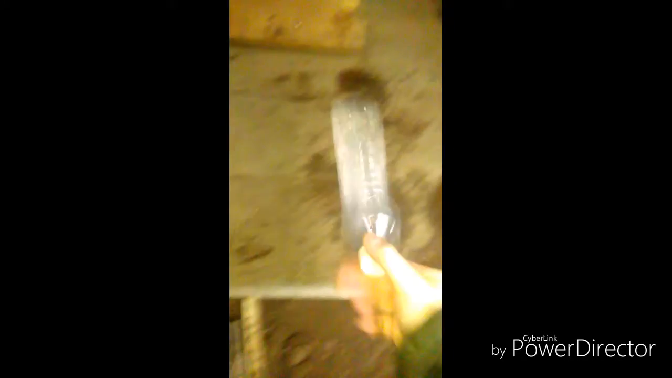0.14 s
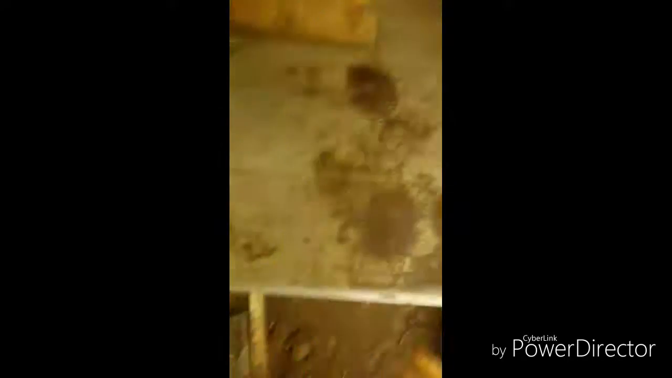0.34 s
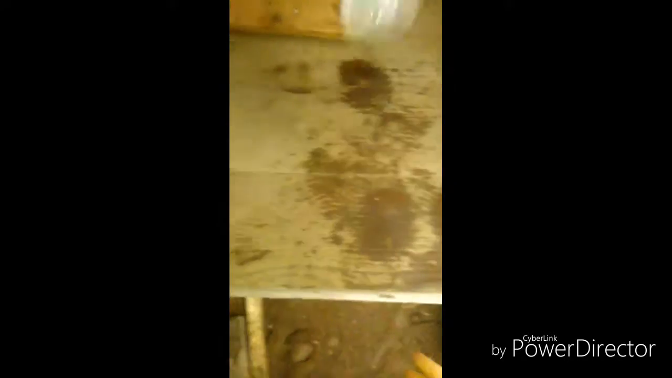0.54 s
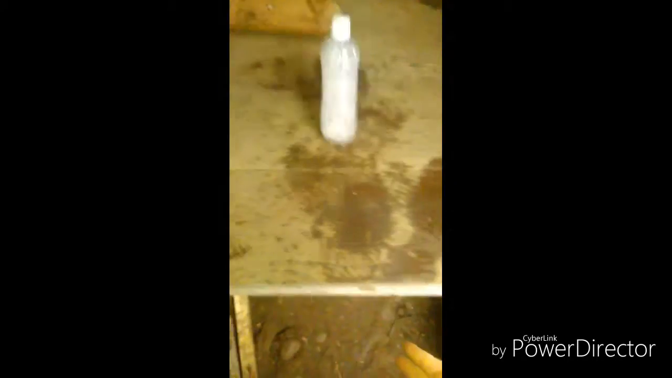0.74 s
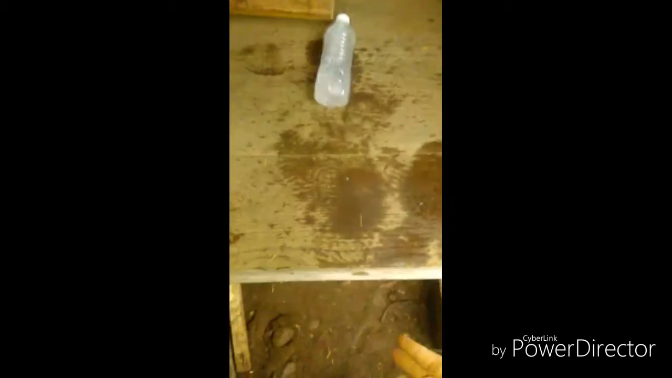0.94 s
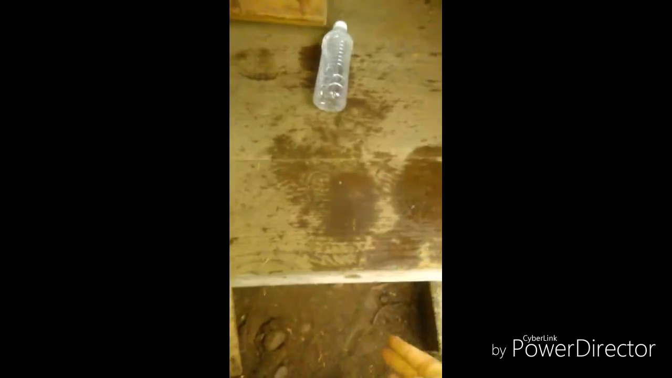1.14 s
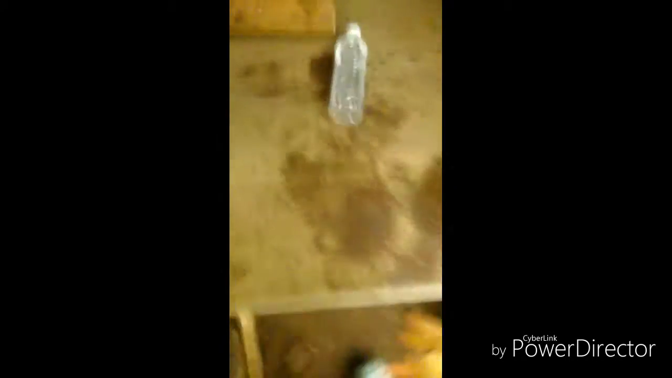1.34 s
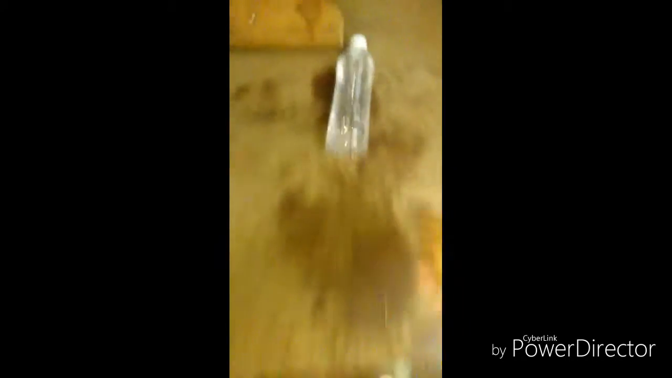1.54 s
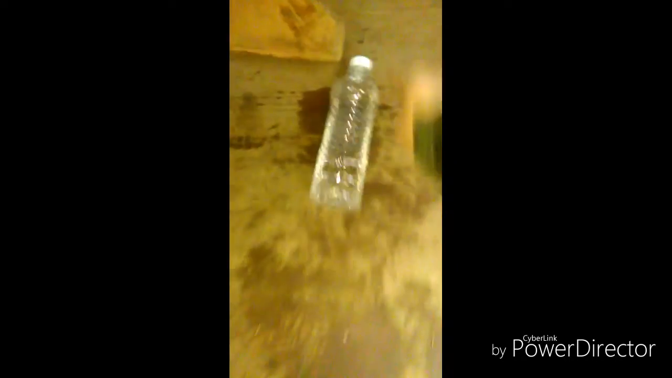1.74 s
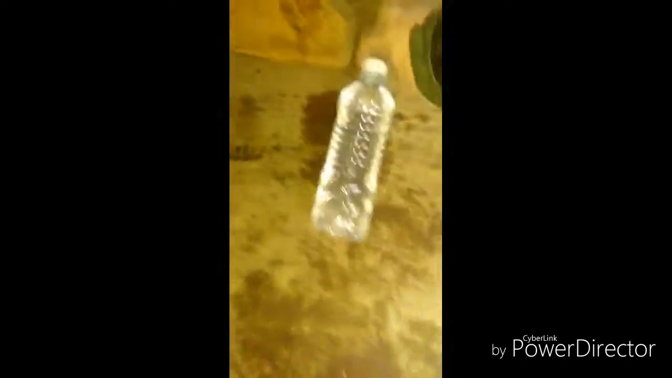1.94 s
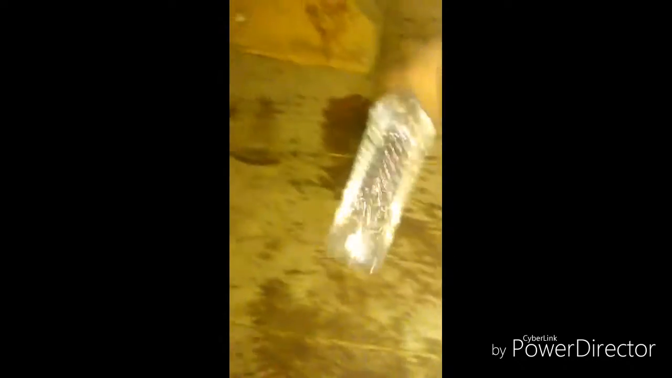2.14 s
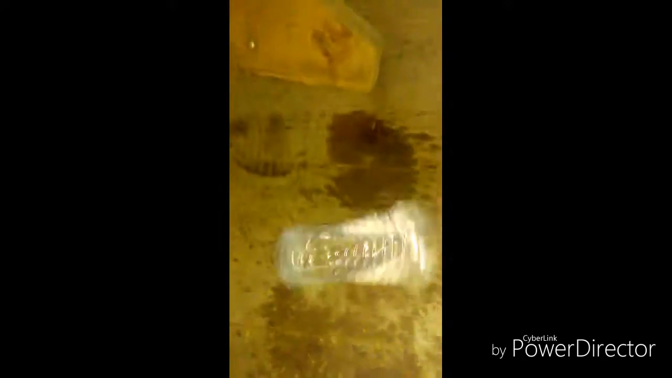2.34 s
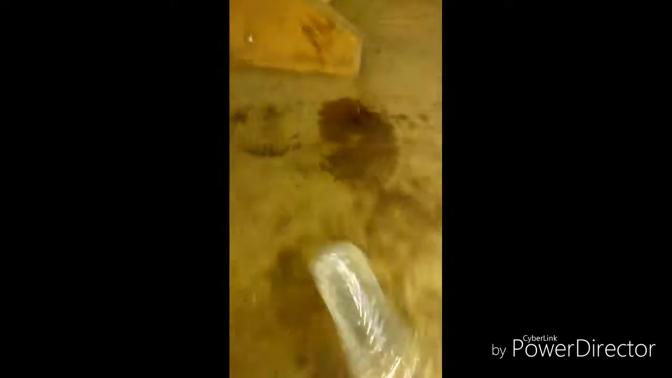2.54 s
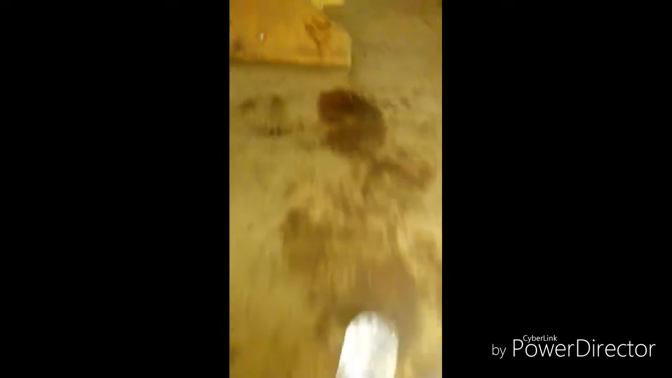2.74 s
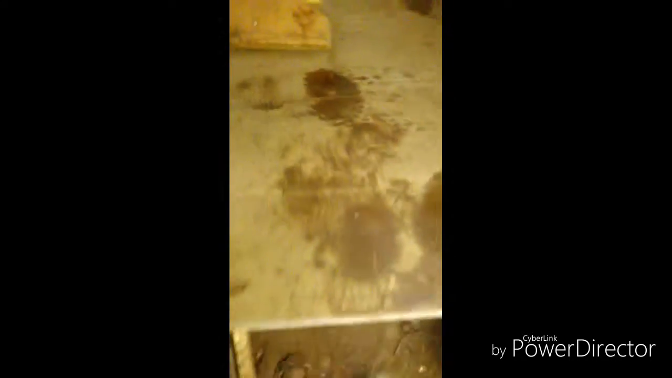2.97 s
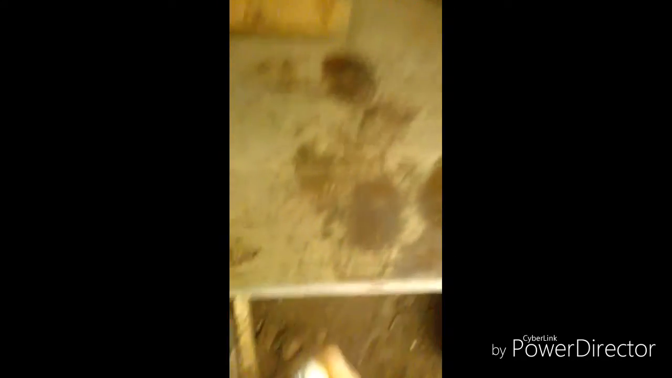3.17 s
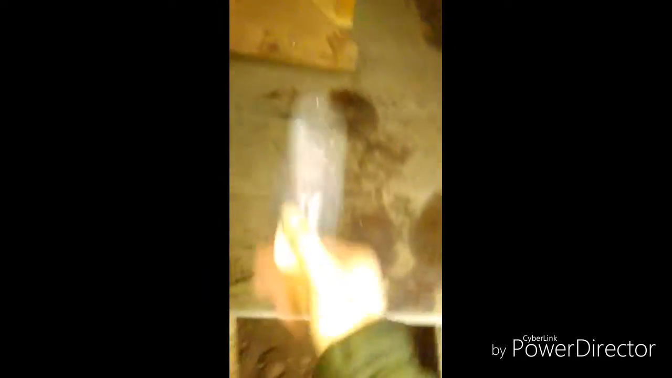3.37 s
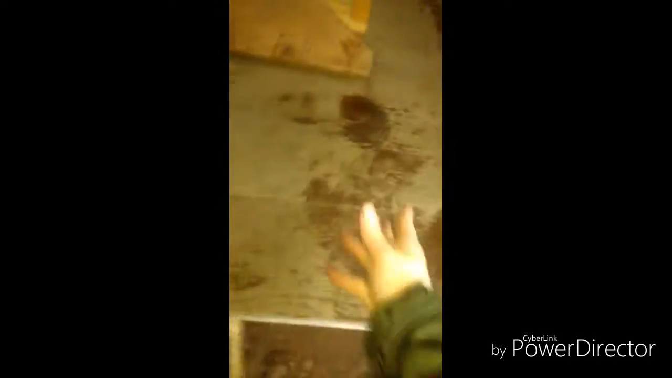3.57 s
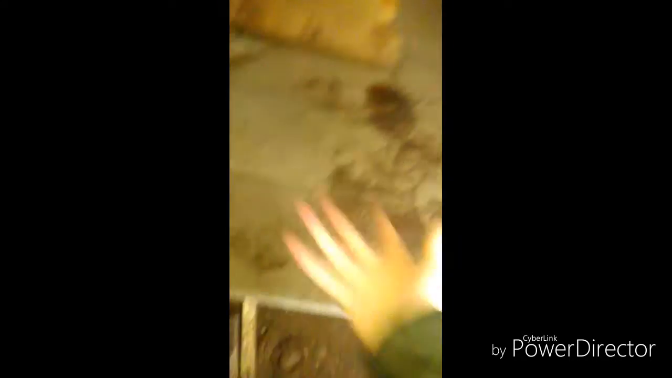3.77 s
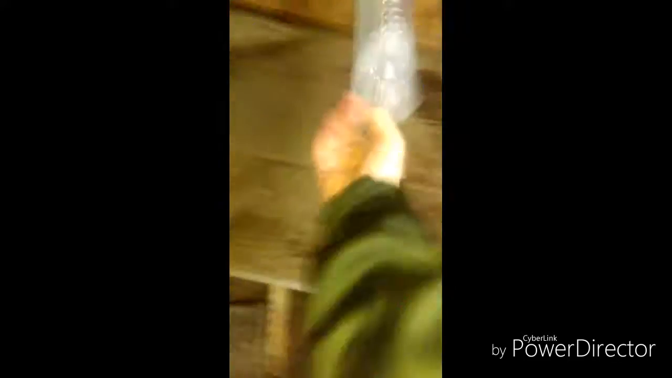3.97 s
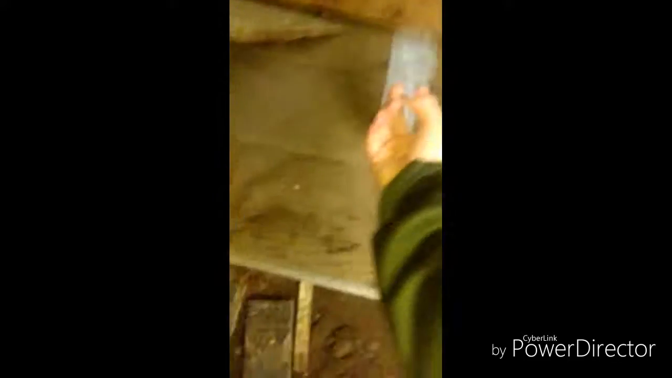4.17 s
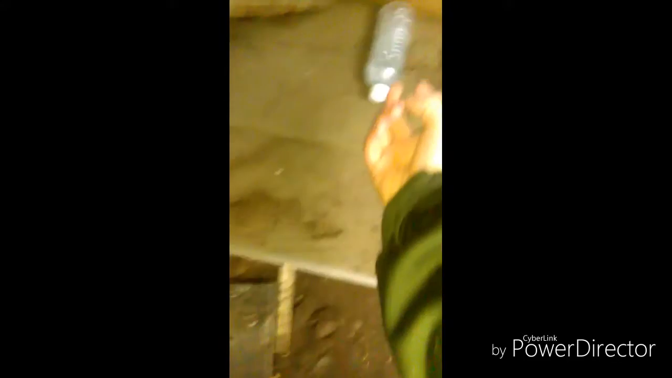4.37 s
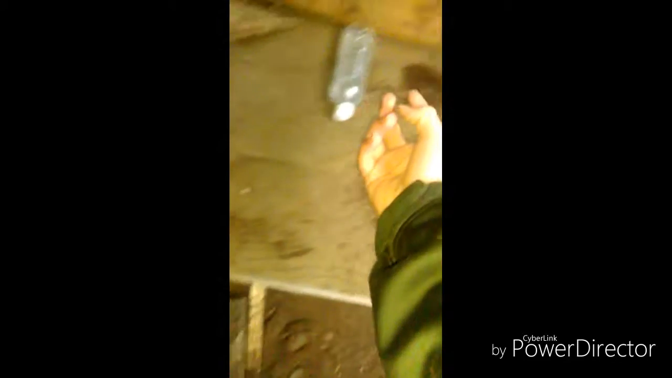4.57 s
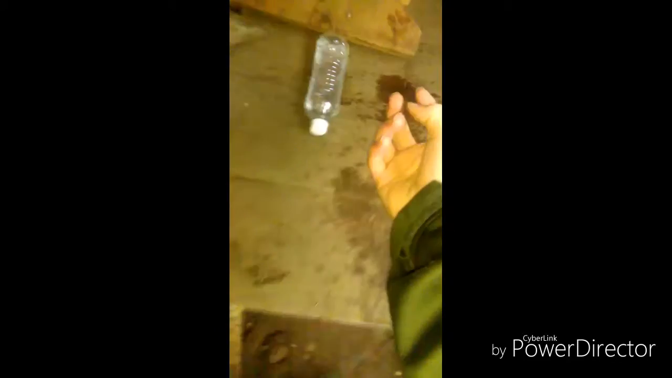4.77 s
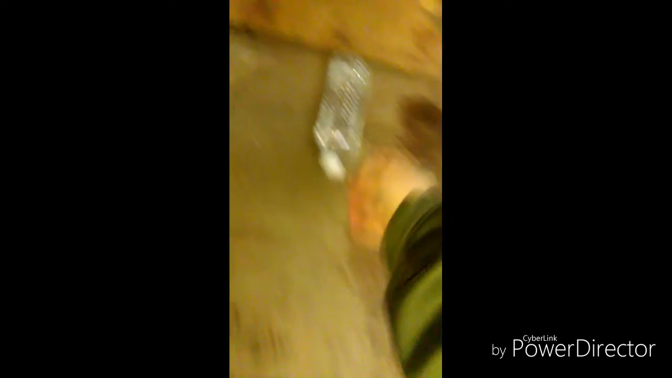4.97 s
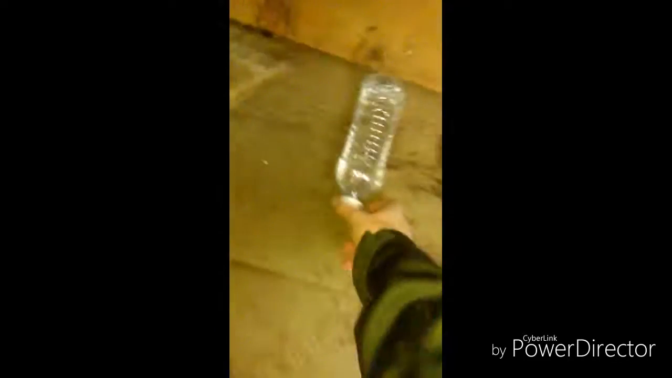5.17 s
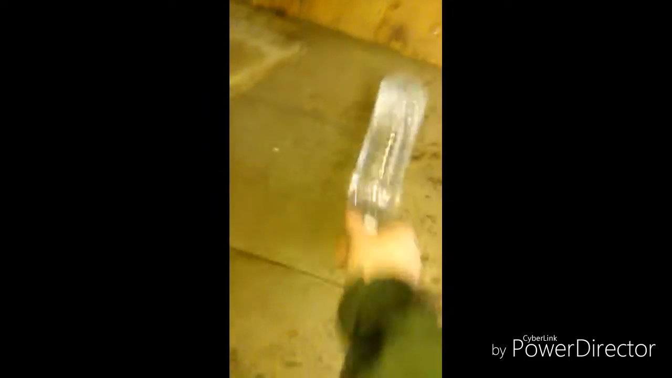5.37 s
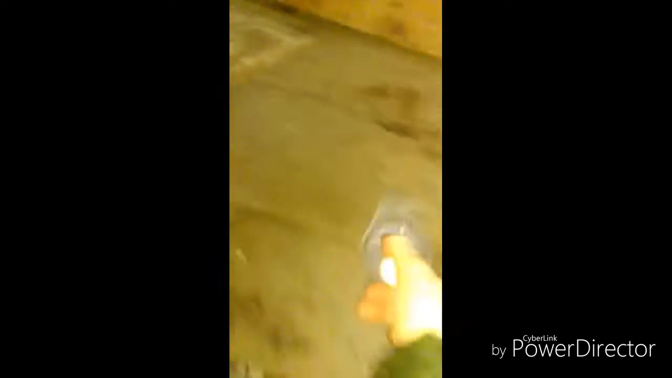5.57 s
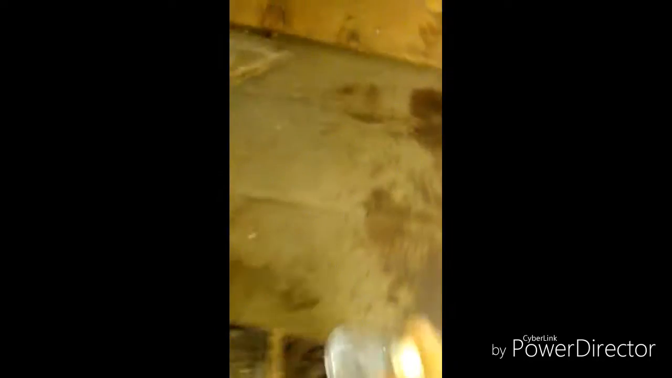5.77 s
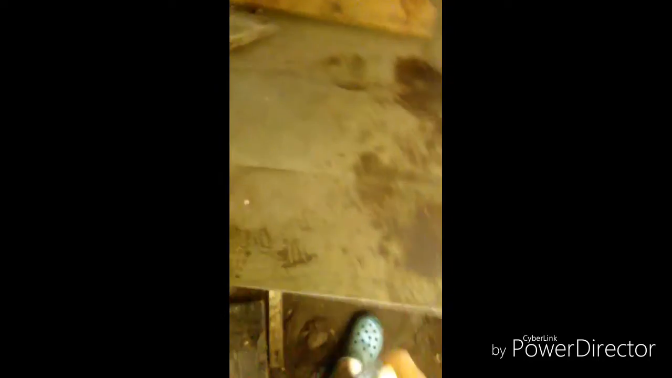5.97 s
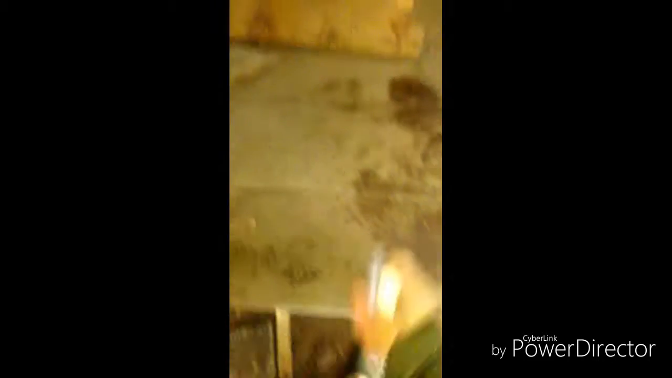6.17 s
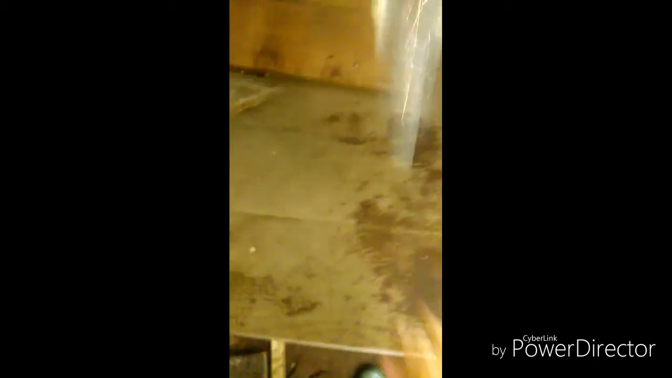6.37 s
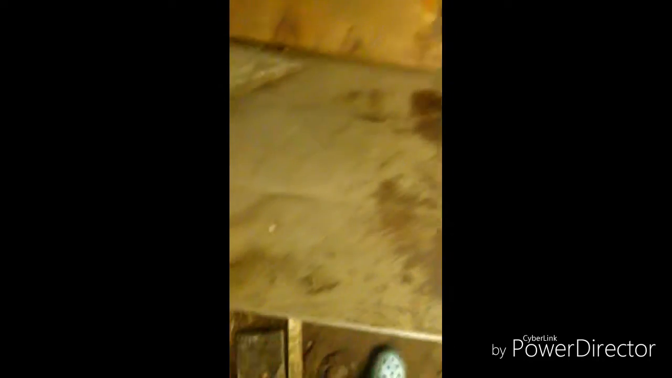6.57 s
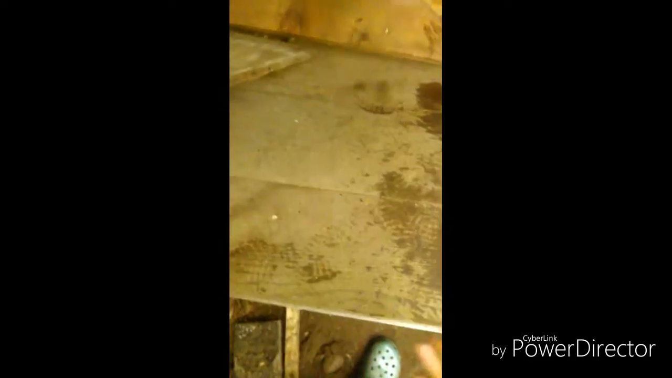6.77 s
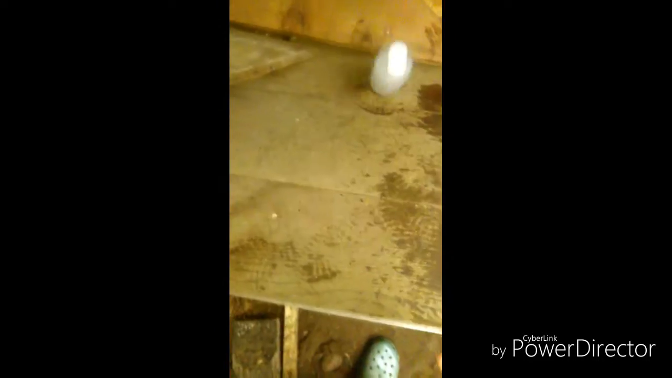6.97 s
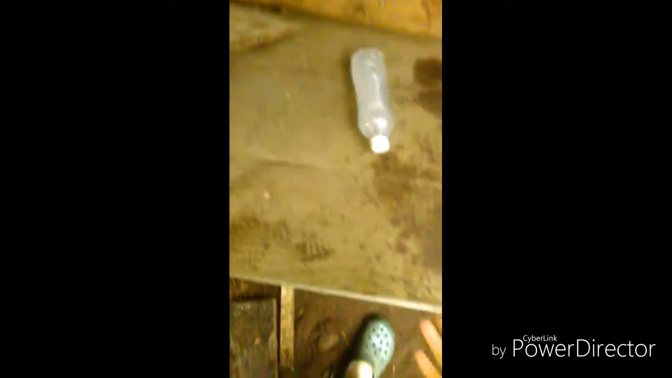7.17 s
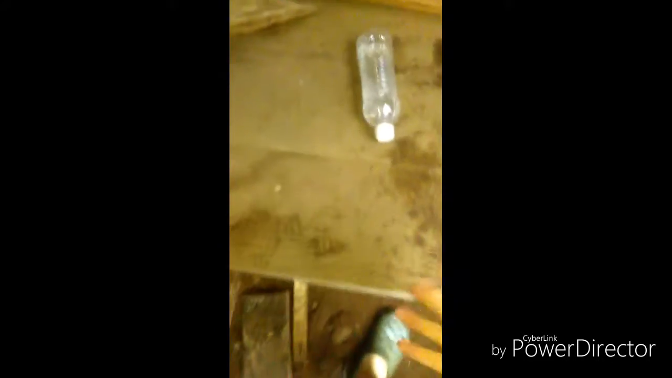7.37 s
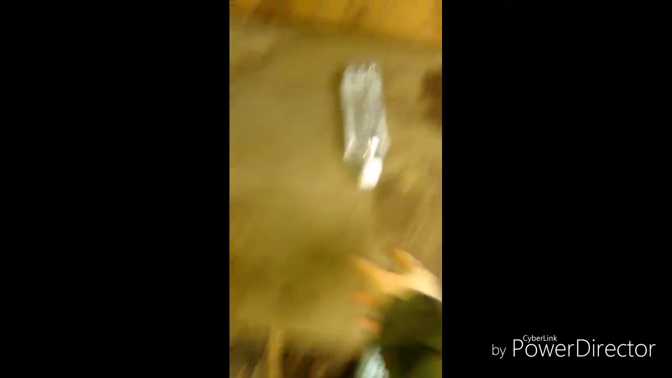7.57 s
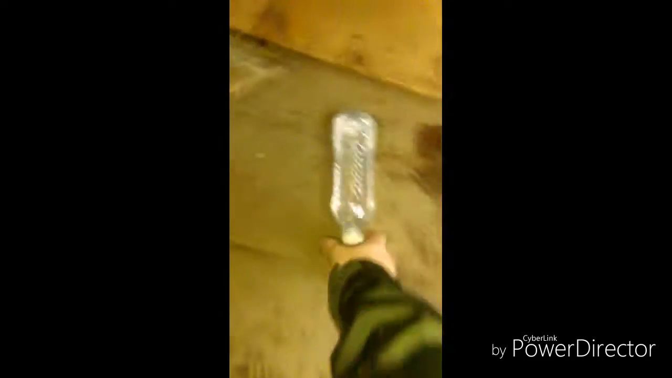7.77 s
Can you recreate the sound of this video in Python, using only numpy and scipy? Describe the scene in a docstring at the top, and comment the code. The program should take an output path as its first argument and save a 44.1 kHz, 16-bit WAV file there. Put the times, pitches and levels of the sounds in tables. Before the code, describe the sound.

A part-filled plastic bottle is flipped three times onto wooden boards, landing with hard cracking thuds, toppling with clatter, then grabbed with crinkles and sloshing.

```python
"""A part-filled plastic water bottle is flipped three times onto wooden boards in a small, hard-walled room.
Each time it lands with a thud and a crack of its thin shell, topples and clatters down on its side.
Boards, body and shell are banks of damped modes struck in quick contacts; noise bursts add crack and crinkle.
Between throws a hand grabs it (taps, squeaks, scuffs, dents) and the water sloshes as noise and bubbles.
Shaped noise makes the sleeve, low bumps, a soft brush and the air; decaying noise makes the room."""
import sys
import numpy as np
from scipy import signal
from scipy.fft import rfft, irfft, next_fast_len
from scipy.io import wavfile
from scipy.ndimage import map_coordinates

SR = 44100
rng = np.random.default_rng(int(sys.argv[2]) if len(sys.argv) > 2 else 0)


def wav_record(signal):
    """Record a signal, one row per channel, as 16-bit PCM in the file named by sys.argv[1]."""
    frames = np.transpose(np.atleast_2d(signal))
    bounded = np.clip(frames, -1, 1)
    # unit amplitude maps onto the largest positive 16-bit level
    quanta = np.round(bounded * 32767).astype(np.int16)
    wavfile.write(sys.argv[1], SR, quanta)


N = 344904  # length in samples
RING = np.arange(SR // 4) / SR  # time axis of one short sound, s

# modes of the wooden boards: (f/Hz, level/dB, t60/s)
BOARDS = [(46.7, -29, 0.94), (63, -23, 0.75), (73.7, -19.5, 0.71), (93.4, -12, 0.35), (111.2, -15.5, 0.49),
          (148, 8, 0.053), (149.1, -5.5, 0.18), (196.6, -14, 0.35), (238.4, -2, 0.037)]
# modes of the water-loaded body: (f/Hz, level/dB, t60/s)
BODY = [(264, 5, 0.047), (303.5, 0.5, 0.15), (339.6, -10.5, 0.29), (356, -3, 0.011), (471, -1, 0.14),
        (552, -5.5, 0.1), (617, -12.5, 0.071), (706, -8, 0.071), (1070, -26, 0.0049), (1062, -4, 0.058)]
# modes of the thin shell: (f/Hz, level/dB, t60/s)
SHELL = [(1700, -19, 0.03), (1876, -15, 0.03), (1990, -7, 0.014), (2285, 3, 0.018), (2550, -4, 0.018),
         (2710, -9, 0.014), (2860, -7, 0.018), (3420, -17, 0.02), (3700, -13, 0.016), (4350, -17, 0.03)]
# spectrum of the shell's crack: (f/Hz, level/dB)
CRACK = [(400, -15), (900, 13.5), (1400, 7), (2400, 8), (3500, -2), (5500, -6), (8000, -2), (15000, -44)]
# spectrum of the crinkling wall: (f/Hz, level/dB)
CRINKLE = [(2500, -3.5), (5000, 1), (7000, 2), (10000, 7), (12500, -3.5), (15000, -10)]
# spectrum of gulping water: (f/Hz, level/dB)
GULP = [(100, -16), (200, -3), (300, -0.5), (420, -6), (620, -1), (800, -11), (1100, -9.5), (2500, -44)]


def amp(db):
    """Decibels to gain."""
    return 10 ** (np.asarray(db) / 20)


def unit(x):
    """Scale to rms 1."""
    return x / np.sqrt(np.mean(x ** 2) + 1e-20)


def along(points, hz):
    """Read (f/Hz, value) points on a log frequency axis."""
    f, v = np.transpose(points)
    return np.interp(np.log(hz + 1), np.log(f), v)


def filtered(x, response):
    """Multiply the spectrum of x by a response of frequency."""
    n = x.shape[-1]
    padded = next_fast_len(n + 8192)
    return irfft(rfft(x, padded) * response(np.fft.rfftfreq(padded, 1 / SR)), padded)[..., :n]


def tilted(x, balance):
    """Favour one channel over the other by (f/Hz, left minus right/dB) points."""
    return filtered(x, lambda hz: amp(np.outer([.5, -.5], along(balance, hz))))


def noise(spectrum, size):
    """Diffuse stereo noise of rms 1: alike in the bass, less related in the treble."""
    # left-right likeness of diffuse sound: (f/Hz, correlation)
    likeness = [(100, 0.87), (300, 0.98), (650, 0.69), (1400, 0.24), (3000, 0.28)]

    def mid_and_side(hz):
        turn = np.arccos(np.clip(along(likeness, hz), -1, 1)) / 2
        return amp(along(spectrum, hz)) * [np.cos(turn), np.sin(turn)]

    mid, side = filtered(rng.standard_normal((2, size)), mid_and_side)
    return unit(np.array([mid + side, mid - side]))


def flutter(rate, depth_db):
    """A smooth random gain of rms 1, rate knots a second."""
    knots = rng.standard_normal(int(N * rate / SR) + 4)
    return unit(amp(depth_db * map_coordinates(knots, [np.arange(N) * rate / SR])))


def swells(rows, attack, release, order=2):
    """Gain for (t, length, level, ..) rows: rise 20 dB in attack s, hold, fall 20 dB in release s.

    order is the column of the level."""
    t = np.arange(N) / SR

    def level(row):
        s, length = row[:2]
        outside = np.maximum(s - t, 0) / attack + np.maximum(t - s - length, 0) / release
        return row[order] - 20 * outside

    return amp(np.max([level(row) for row in rows], axis=0))


def add(track, s, sound):
    """Mix a sound into the track at time s, cut at the end."""
    rest = track[..., round(s * SR):]
    rest[..., :sound.shape[-1]] += sound[..., :rest.shape[-1]]


def struck_near(modes, hz):
    """The spot that is struck favours the modes around one frequency."""
    spot_db, spot_octaves = 6, 0.3  # how much and how widely
    f, db, t60 = np.transpose(modes)
    favour = spot_db * np.exp(-(np.log2(f / hz) / spot_octaves) ** 2)
    return np.transpose([f, db + favour, t60])


def ring(modes, scatter_db, detune, pitch=1, linger=1):
    """Damped modes of alternating sign; strength and pitch scatter from strike to strike."""
    hz, db, t60 = np.transpose(modes)[:, :, None]
    size, shift = rng.standard_normal((2, len(modes), 1))
    sign = np.cos(np.pi * np.arange(len(modes)))[:, None]
    strength = amp(db + scatter_db * size) * sign
    turn = 2 * np.pi * hz * pitch * (1 + detune * shift)  # radians per second
    decay = np.exp(-np.log(1000) * RING / (t60 * linger))
    # the surface swings up within a fraction of a cycle; the air is pushed by its velocity
    swing = decay * np.sin(turn * RING) * (1 - np.exp(-turn * RING)) / turn
    return -np.diff(np.sum(strength * swing, axis=0), prepend=0) * SR / np.linalg.norm(strength)


def burst(spectrum, t60, attack):
    """A dying puff of coloured noise."""
    colour = amp(along(spectrum, np.fft.rfftfreq(len(RING), 1 / SR)))
    puff = irfft(rfft(rng.standard_normal(len(RING))) * colour, len(RING))
    return unit(puff) * amp(-60 * RING / t60) * (1 - np.exp(-RING / attack))


def slip_run(per_s, spread_db):
    """Friction as single-sample slips at random times and strengths."""
    happens = rng.random(len(RING)) < per_s / SR
    return happens * amp(spread_db * rng.standard_normal(len(RING)))


def stroke(length, attack, release):
    """Gain of one rub: a soft start, then a fall of 20 dB in release s once length is over."""
    return (1 - np.exp(-RING / attack)) * amp(-20 * np.maximum(RING - length, 0) / release)


def in_room(send, build=0.00061, count=3):
    """Decaying noise as reverberation: builds up within milliseconds, drawn anew for each third of the scene."""
    # reverberation time: (f/Hz, t60/s)
    room_t60 = [(70, 0.73), (120, 0.57), (220, 0.42), (600, 0.36), (2500, 0.29), (6000, 0.32),
                (14000, 0.13)]
    # colour of the reverberation: (f/Hz, level/dB)
    room_gain = [(60, -4), (150, -0.5), (500, 3), (1200, 2.5), (3000, 10), (8000, 7.5), (15000, 7)]
    early_db, early_s = 5, 0.004  # the nearest walls over the later sound, and how fast their answer fades
    heard = np.zeros((2, N))
    for part in np.array_split(np.arange(N), count):
        hz, t, z = signal.stft(noise([(20, 0), (20000, 0)], SR // 2), SR, nperseg=256)
        fade_db = along(room_gain, hz)[:, None] - 60 * t / along(room_t60, hz)[:, None]
        tail = signal.istft(z * amp(fade_db), SR, nperseg=256)[1]
        age = np.arange(tail.shape[1]) / SR
        tail *= (1 - np.exp(-age / build)) ** 2 * (1 + amp(early_db) * np.exp(-age / early_s))
        add(heard, part[0] / SR, signal.fftconvolve(send[None, part], tail / np.linalg.norm(tail[0]), axes=1))
    return heard


def scattered(source, count=3):
    """Each side of the bottle radiates its own mix of modes, so the room's answer is dense and smooth."""
    return sum(in_room(source()) for side in range(count)) / np.sqrt(count)


def at_ports(direct, lag=0.0002615):
    """The direct sound reaches the left channel slightly later (lag in s)."""
    return filtered(direct, lambda hz: np.exp(-2j * np.pi * np.outer([lag, 0], hz)))


def background():
    """Quiet room air and hiss as shaped noise, stronger on the left; its level drifts a little."""
    # spectrum of air and hiss: (f/Hz, level/dB)
    air = [(15, -34), (25, 5), (44, -5), (141, -1.5), (229, -6), (607, -5), (1560, -12.3), (2480, -10.2),
           (5000, -20.7), (9570, -19), (11600, -22.5), (14800, -27.3), (16000, -38)]
    # lean of the hiss to the left: (f/Hz, left minus right/dB)
    hiss_side = [(100, 4.5), (500, 4.5), (1300, 5.5), (2800, 6), (5000, 9), (8500, 8), (14000, 12.5)]
    drift = flutter(rate=3, depth_db=.5)
    return amp(-53.2) * drift * tilted(noise(air, N), hiss_side)


def handling():
    """Cloth rubs on cloth as the arm swings; small, dull low bumps come and go."""
    # sleeve swishes: (t/s, length/s, level/dB)
    swings = [(.02, 0.047, -54.5), (.3, 0.1, -59), (2.3, 0.061, -50), (2.51, 0.72, -56), (3.03, .27, -53),
              (3.98, 0.07, -43), (5.49, 0.12, -52.5)]
    # low bumps: (t/s, length/s, level/dB)
    jostles = [(0.3, 0.069, -56), (1.83, 0.31, -50), (3.99, 0.091, -44.5), (5.235, 0.028, -43),
               (5.32, 0.038, -43.5), (5.42, 0.32, -49)]
    # spectrum of the sleeve: (f/Hz, level/dB)
    cloth = [(800, -32), (2000, -2.5), (3200, -2.5), (5000, -8.5), (8000, -6.5), (11000, -11), (15000, -27)]
    # spectrum of the bumps: (f/Hz, level/dB)
    bump = [(18, -13), (40, -1), (70, 1.5), (130, -4.5), (220, -11), (450, -48)]
    sleeve = swells(swings, attack=0.18, release=0.23) * noise(cloth, N) * flutter(rate=130, depth_db=1.5)
    bumps = swells(jostles, attack=0.052, release=0.093) * noise(bump, N) * flutter(rate=27, depth_db=3.0)
    return sleeve + bumps


def brushing():
    """A soft, short, dull rub before the second throw: fluttering shaped noise."""
    # rubs: (t/s, length/s, level/dB)
    brushes = [(3.125, 0.048, -42.5)]
    # spectrum of the rub: (f/Hz, level/dB)
    rub = [(500, -12), (1200, -8.5), (1950, -2.5), (3000, -11.5), (6000, -19), (12000, -53)]
    return swells(brushes, attack=0.26, release=0.072) * noise(rub, N) * flutter(rate=170, depth_db=1.5)


def squeaks():
    """Fingers stick and slip on the wall; each slip rings it briefly."""
    # squeaks: (t/s, length/s, level/dB, pitch factor)
    rows = [(2.272, 0.035, -46, 1), (2.484, 0.055, -45.5, 1), (2.588, 0.07, -44, 1),
            (3.565, .035, -49, 1.22)]
    # modes of the rubbed wall: (f/Hz, level/dB, t60/s)
    grip = [(1305, 6, 0.048), (2000, -13, 0.014), (2530, -13, .02)]
    track = np.zeros(N)
    for s, length, db, pitch in rows:
        slips = slip_run(per_s=600, spread_db=4.5)
        wall = signal.fftconvolve(slips, ring(grip, scatter_db=0, detune=0, pitch=pitch))[:len(RING)]
        add(track, s, amp(db) * stroke(length, attack=0.0044, release=0.03) * unit(wall))
    return track


def scuffs():
    """Skin scrapes over the ribbed wall: a dense, uneven run of slips whose colour depends on the spot."""
    # scrapes: (t/s, length/s, level/dB, pitch factor)
    rows = [(0.284, 0.021, -44, 0.94), (2.65, 0.0083, -58, 1.03), (2.675, 0.017, -47, 0.94),
            (2.756, 0.018, -60, 2.5), (2.761, 0.031, -58, 1.1), (2.81, 0.0097, -45, 0.78),
            (2.819, 0.036, -62, 3.4), (3.548, 0.012, -44.5, 1.1), (3.559, 0.017, -54, 3.2),
            (4.053, 0.033, -41, 1.14), (5.402, 0.069, -49.5, 0.82), (5.602, 0.072, -46, 1),
            (7.666, 0.037, -44, 0.9)]
    # spectrum of a scrape at pitch factor 1: (f/Hz, level/dB)
    colour = [(100, -6), (300, -5.5), (700, 3), (1200, -10), (2500, -6.5), (6000, -25.5)]
    track = np.zeros(N)
    hz = np.fft.rfftfreq(len(RING), 1 / SR)
    for s, length, db, pitch in rows:
        slips = slip_run(per_s=730, spread_db=4.5)
        scrape = irfft(rfft(slips - slips.mean()) * amp(along(colour, hz / pitch)), len(RING))
        add(track, s, amp(db) * stroke(length, attack=0.003, release=0.029) * unit(scrape))
    return track


def dent(hz):
    """The short, dry pop of a dent as a few damped modes, each a little different."""
    # modes of a popping dent: (multiple of its pitch, level/dB, t60/s)
    modes = [(.78, -4, .014), (1, 3, 0.013), (1.42, -3, 0.013), (1.9, -10, 0.008), (2.6, -13, 0.008)]
    return ring(modes, scatter_db=2, detune=0.03, pitch=hz)


def snaps():
    """Under the fingers the wall snaps in single ticks, or crackles in runs of tiny ones as the grip shifts."""
    # single dents snapping out: (t/s, crinkle level/dB, pop level/dB, pop f/Hz)
    single = [(0.229, -48, -60, 2400), (.305, -39, -22, 1360), (0.33, -32.5, -48, 2000),
              (0.501, -43, -58, 2400), (0.522, -47, -60, 2400), (1.58, -41, -21, 1690),
              (2.2075, -35, -20, 2360), (2.271, -26, -31, 2860), (2.276, -35, -25, 2220),
              (4.67, -36.5, -62, 2400), (5.493, -39, -22, 2380), (5.521, -50, -27, 2400),
              (5.6, -41, -26, 2040), (6.403, -51, -25, 1480), (6.434, -32.5, -35, 2400),
              (7.421, -64, -26, 2070)]
    # runs of crackle: (t/s, length/s, level/dB, f/Hz)
    runs = [(0.287, .018, -30, 1010), (1.566, 0.013, -45, 1790), (1.587, 0.017, -40, 1800),
            (2.674, 0.029, -37, 740), (2.679, 0.019, -43, 2000), (2.731, .1, -34.5, 775),
            (2.754, .025, -40, 1880), (2.818, .06, -43.5, 1750), (5.531, .06, -43, 1300),
            (5.615, .045, -38.5, 1500)]
    ticks_per_s, spread_octaves, spread_db = 590, 0.44, 5  # spread in pitch and in strength
    track = np.zeros(N)
    for s, crinkle_db, pop_db, hz in single:
        crinkle = amp(crinkle_db) * burst(CRINKLE, t60=0.016, attack=0.00038)
        add(track, s, crinkle + amp(pop_db) * dent(hz))
    for s, length, db, hz in runs:
        for when, size, shift in rng.random((int(np.ceil(length * ticks_per_s)), 3)):
            tick_hz = hz * 2 ** (spread_octaves * (2 * shift - 1))
            tick_db = db + spread_db * (2 * size - 1.5)
            add(track, s + when * length, amp(tick_db) * dent(tick_hz))
    return track


def bubbles(rate, hz, spread, cycles, rise=0.38):
    """A stream of rate bubbles a second, of rms 1, each a short ring that rises in pitch."""
    u = rng.random((int(rate * N / SR), 3))
    start = u[:, :1] * N
    pitch = hz * 2 ** (spread * (2 * u[:, 1:2] - 1))  # within spread octaves of hz
    size = amp(-18 * u[:, 2:])
    k = np.arange(int(SR * cycles / hz))
    age = k / SR * pitch / cycles  # reaches 1 when the ring is 60 dB down
    waves = size * np.exp(-np.log(1000) * age) * np.sin(2 * np.pi * cycles * age * (1 + rise * age))
    return unit(np.bincount((start.astype(int) + k).ravel(), waves.ravel(), N)[:N])


def water():
    """The tipped water gulps from end to end and splashes against the wall in uneven surges."""
    # the water runs to the other end: (t/s, length/s, gulp level/dB, splash level/dB)
    sloshes = [(2.28, 0.1, -44, -51.5), (2.49, 0.047, -47, -47.5), (2.6, 0.049, -43.5, -47.5),
               (2.678, 0.017, -43, -46), (2.745, 0.11, -45.5, -45.5), (4.0, 0.093, -51, -47.5),
               (5.41, 0.13, -48.5, -56.5), (5.57, 0.12, -45, -50)]
    # spectrum of the splash: (f/Hz, level/dB)
    splash_colour = [(500, -36), (900, -3), (1300, 3), (2100, 6), (3000, -21), (5000, -55), (9000, -54)]
    gulp = unit(1.75 * noise(GULP, N)[0] + bubbles(rate=110, hz=560, spread=0.65, cycles=23))
    splash = unit(0.5 * noise(splash_colour, N)[0] + bubbles(rate=260, hz=1500, spread=0.7, cycles=17))
    surge = flutter(rate=60, depth_db=2.5)
    gulp_gain = swells(sloshes, attack=0.044, release=0.025, order=2)
    splash_gain = swells(sloshes, attack=0.044, release=0.025, order=3)
    return surge * (gulp_gain * gulp + splash_gain * splash)


def taps():
    """Fingers and gentle rocking damp the bottle: the same body, with a duller, slower pat."""
    # the bottle rocks, is grabbed or let go: (t/s, strength/dB, weight behind it/dB, wall f/Hz)
    rows = [(0.290, -32.5, -30.5, 1010), (0.303, -33.5, -30, 1090), (1.268, -45, -36.5, 1240),
            (1.578, -42.5, -42, 1310), (1.627, -51, -44, 700), (1.835, -43, -50, 1160),
            (1.868, -45, -41, 1150), (1.936, -44.5, -41, 920), (2.207, -31, -33, 993),
            (2.273, -30, -37, 1310), (3.564, -38.5, -39, 1540), (3.706, -65, -41, 900),
            (3.984, -47, -26, 1260), (4.065, -32, -31, 1300), (4.984, -41.5, -34.5, 1950),
            (5.222, -60, -31.5, 1010), (5.257, -56, -33, 1270), (5.326, -48, -37, 1460),
            (5.496, -33, -31.5, 1060), (5.52, -31, -38, 1230), (5.599, -31.5, -34.5, 1640),
            (5.672, -41, -31, 960), (6.396, -32, -30.5, 970), (6.566, -46, -43, 1090),
            (7.37, -47, -38, 650), (7.421, -42.5, -40.5, 1010)]
    # modes of the wall between the fingers: (multiple of the wall pitch, level/dB, t60/s)
    held = [(.75, -8, 0.03), (1, 10, 0.012), (1.2, 0, 0.02), (1.55, -3, 0.012), (2, -1, 0.014),
            (2.7, -12, 0.014)]
    # spectrum of the pat: (f/Hz, level/dB)
    pat_colour = [(300, 0), (800, 9.5), (1200, 5), (1900, 1.5), (3000, -9), (5000, -17), (8000, -21),
                  (15000, -51)]
    knock_db = -1.5  # hollow knock over the weight
    wall_db, pat_db, crinkle_db = 11.5, 4, -9.5  # over the strength
    track = np.zeros(N)
    for s, strength_db, weight_db, wall_hz in rows:
        boards = ring(struck_near(BOARDS, hz=190), scatter_db=7.0, detune=0.086)
        thud = amp(weight_db) * boards * amp(-60 * RING / 0.29)  # extra damping
        knock = amp(weight_db + knock_db) * ring(BODY, scatter_db=4, detune=0.066, linger=0.6)
        wall = amp(strength_db + wall_db) * ring(held, scatter_db=2, detune=0.034, pitch=wall_hz)
        pat = amp(pat_db) * burst(pat_colour, t60=0.029, attack=0.00037)
        crinkle = amp(crinkle_db) * burst(CRINKLE, t60=0.039, attack=0.00017)
        softened = (thud + knock + wall) * (1 - np.exp(-RING / 0.0008))
        add(track, s, softened + amp(strength_db) * (pat + crinkle))
    return track


def buckles():
    """At a hard contact the wall gives way with one dry clack: shell modes, crack and crinkle."""
    # the wall buckles under a blow: (t/s, shell ring level/dB, crack level/dB, crinkle level/dB)
    rows = [(0.8145, -11.5, -15, -22), (4.2555, -21, -29, -18.5), (4.4186, -9, -30, -33),
            (4.4237, -14, -30, -33), (4.428, -30, -28, -17), (7.0025, -14, -25, -22),
            (7.2425, -29, -38, -23)]
    track = np.zeros(N)
    for s, ring_db, crack_db, crinkle_db in rows:
        shell = amp(ring_db) * ring(SHELL, scatter_db=1, detune=0.005, linger=1.3)
        crack = amp(crack_db) * burst(CRACK, t60=0.016, attack=0.00022)
        crinkle = amp(crinkle_db) * burst(CRINKLE, t60=0.0091, attack=0.00025)
        add(track, s, shell + crack + crinkle)
    return track


def push(hz, life):
    """The first shove of a contact: about one cycle of pressure, fading over life seconds."""
    return np.sin(2 * np.pi * hz * RING) * np.exp(-RING / life)


def thump(thud_db, knock_db, linger, board_hz, body_hz):
    """Weight arrives: it thumps the boards, rings the water-loaded body and jolts the water."""
    shove_db, jolt_db = 6, -11  # over the knock
    thud = amp(thud_db) * ring(struck_near(BOARDS, board_hz), scatter_db=1, detune=.012)
    shove = amp(shove_db) * push(hz=619, life=0.0017)
    knock = ring(struck_near(BODY, body_hz), scatter_db=0.5, detune=0.015, linger=linger)
    jolt = amp(jolt_db) * burst(GULP, t60=0.21 * linger, attack=0.00063)
    return thud + amp(knock_db) * (shove + knock + jolt)


def clack(shell_db, crinkle_db, ring_db):
    """The thin ribbed wall rings, cracks and crinkles; ring_db is the ring over the crack."""
    shell = amp(ring_db) * ring(SHELL, scatter_db=3, detune=0.02)
    crack = burst(CRACK, t60=0.022, attack=0.00026)
    return amp(shell_db) * (shell + crack) + amp(crinkle_db) * burst(CRINKLE, t60=0.0091, attack=0.00009)


def contacts(edge_share):
    """Gains of a blow's contacts: the edge takes its share of energy, the flat the rest, then a weaker rebound."""
    rebound_db = -3  # under the flat contact
    flat_share = 1 - edge_share
    return np.sqrt([edge_share, flat_share, flat_share]) * amp([0, 0, rebound_db])


def landings():
    """Each blow is a quick run of contacts; the water slaps back after a hard one or a snatch upwards."""
    # the bottle hits edge first, then flat; each throw lands once and topples once:
    # (t/s, edge to flat/s, shell level/dB, board thud level/dB, hollow knock level/dB, crinkle level/dB,
    #  edge's share of the weight 0-1, edge's share of the crack 0-1, ring time factor,
    #  shell's ring over its crack/dB, favoured board mode f/Hz, favoured body mode f/Hz)
    blows = [(0.8101, 0.0062, -11, -4.5, -20, -13.5, 0.47, 0.74, 0.9, -8, 127, 470),
             (1.0394, 0.011, -20, -16.5, -17.5, -25, 0.63, 0.63, 0.35, -14, 119, 625),
             (4.2482, 0.0049, -14, -11, -6, -19, 0.96, 1, 0.6, -7, 203, 298),
             (4.4178, 0.011, -15.5, -15, -14, -20, 0.55, 0.57, 0.33, -3.5, 174, 630),
             (6.998, .005, -14, -1.5, -12, -18.5, 0.24, 0.35, 0.73, -6, 189, 533),
             (7.2258, 0.016, -21.5, -19.5, -23.5, -21, 0.88, 0.31, 1.07, -8, 203, 704)]
    # the water slaps against the end of the bottle:
    # (t/s, hollow knock level/dB, board thud level/dB, ring time factor, favoured mode f/Hz)
    water_slaps = [(0.8193, -19.5, -34, 1.23, 354), (2.25, -27.5, -41, 1.6, 400),
                   (2.275, -26.5, -39, 1.7, 284), (4.2824, -18.5, -20, 2.06, 474),
                   (4.433, -18, -40, 0.51, 640), (7.046, -28.5, -29, 2.4, 205)]
    rebound_s = .0026  # the wall springs back and touches once more
    track = np.zeros(N)
    for (s, flat_s, shell_db, thud_db, knock_db, crinkle_db, weight_share, crack_share,
         linger, ring_db, board_hz, body_hz) in blows:
        times = s, s + flat_s, s + flat_s + rebound_s
        for at, weight, crack in zip(times, contacts(weight_share), contacts(crack_share)):
            heavy = weight * thump(thud_db, knock_db, linger, board_hz, body_hz)
            add(track, at, heavy + crack * clack(shell_db, crinkle_db, ring_db))
    for s, knock_db, thud_db, linger, hz in water_slaps:
        add(track, s, thump(thud_db, knock_db, linger, hz, hz))
    return track


def scene():
    """The bottle, its water and the fingers sound into the room; sleeve, bumps, brush and hiss stay dry."""
    pats, ticks, cracks, rubs, slosh = taps(), snaps(), buckles(), squeaks() + scuffs(), water()
    # how much of each reaches the room
    send = pats + amp(-5.5) * ticks + amp(-14) * cracks + amp(-2) * rubs + amp(2) * slosh
    room = amp(-1.5) * scattered(landings) + in_room(send)
    direct = landings() + pats + ticks + cracks + rubs + slosh
    return at_ports(direct) + room + handling() + brushing() + background()


def record(dry):
    """Thin the deepest bass, colour the two channels, round the hardest peaks and cut off the top."""
    # colour difference of the channels: (f/Hz, left minus right/dB)
    ports = [(100, -0.2), (500, 0.5), (1300, 5.5), (2800, 6), (5500, 7.5), (8500, -3), (14000, -7)]
    top_hz = 15400
    thin = signal.sosfilt(signal.butter(N=2, Wn=40, btype="high", fs=SR, output="sos"), dry)
    coloured = tilted(thin, ports)
    rounded = coloured / (1 + np.abs(coloured / .85) ** 6) ** (1 / 6)
    return filtered(rounded, lambda hz: 1 / np.sqrt(1 + (hz / top_hz) ** 200))


dry = scene()
out = record(dry)
wav_record(out)
```